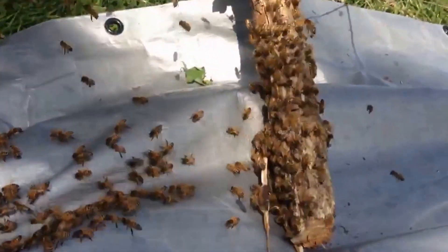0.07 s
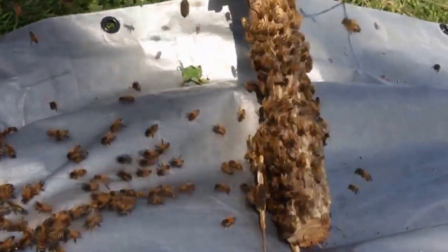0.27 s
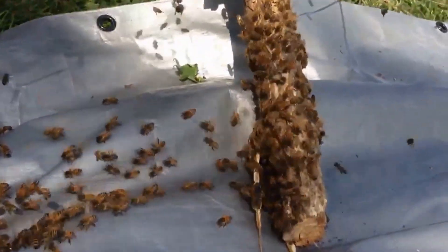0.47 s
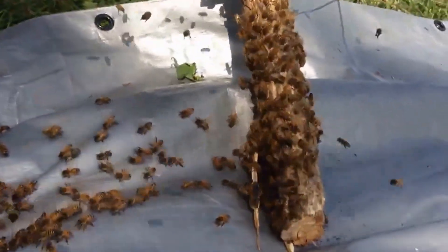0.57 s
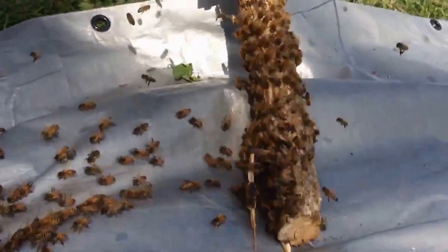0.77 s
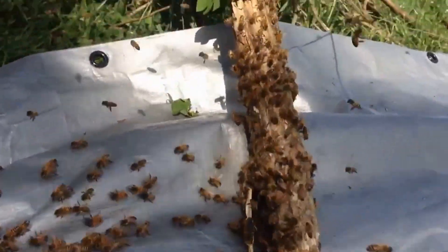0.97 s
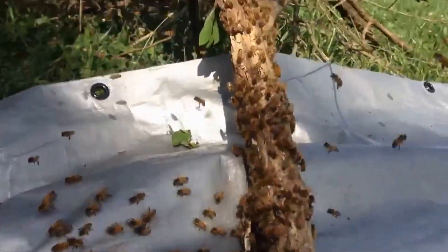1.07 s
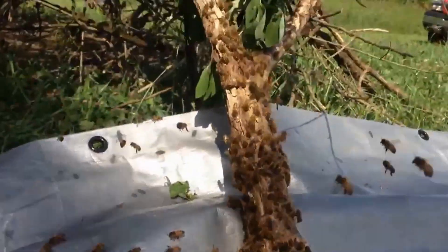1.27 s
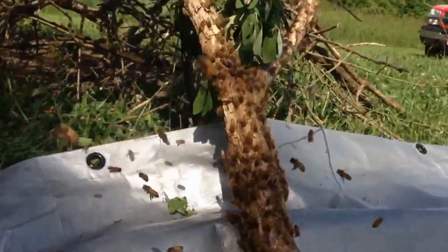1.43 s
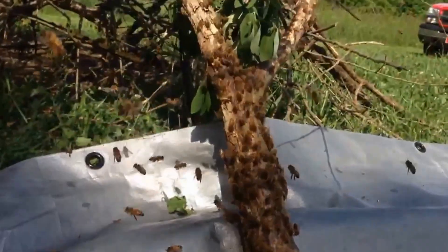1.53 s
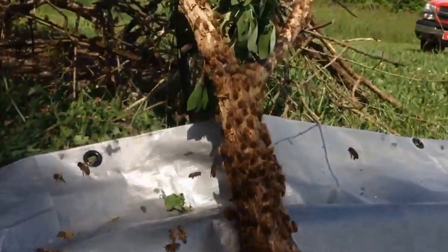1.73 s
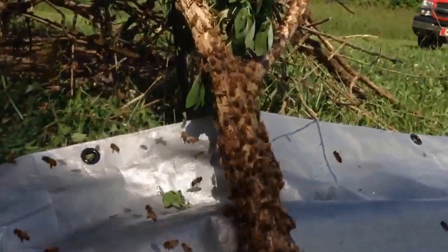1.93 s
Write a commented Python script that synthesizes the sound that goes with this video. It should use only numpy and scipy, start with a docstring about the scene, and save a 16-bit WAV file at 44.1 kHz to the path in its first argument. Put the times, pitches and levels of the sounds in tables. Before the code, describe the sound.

Honeybees hum softly outdoors, with dull bumps on the microphone at the start.

```python
"""A swarm of honeybees hums softly over a tarpaulin outdoors, in a steady hiss of air.
Each bee is a stack of wingbeat harmonics drifting in pitch; a few pass close and stand out.
A hand rubs and bumps the camera, whose case answers with dull thuds; faint high peeps sound far off.
A limiter ducks everything at the first bump and lets it creep back."""
import sys
import numpy as np
from scipy import signal
from scipy.fft import rfft, irfft
from scipy.io import wavfile
from scipy.ndimage import uniform_filter1d, minimum_filter1d

SR = 44100
rng = np.random.default_rng(int(sys.argv[2]) if len(sys.argv) > 2 else 0)


def dump(signal):
    """Clip the signal to [-1, 1] and save it as 16-bit WAV at the path in sys.argv[1]."""
    limited = np.clip(np.atleast_2d(signal).T, -1, 1)
    pcm = np.round(limited * 32767).astype(np.int16)
    wavfile.write(sys.argv[1], SR, pcm)


N = 88200
T = np.arange(N) / SR
FREQS = np.fft.rfftfreq(N, 1 / SR)


def amp(db):
    """Decibels to gain."""
    return 10 ** (np.asarray(db) / 20)


def unit(x):
    """Scales to an rms of one."""
    return x / np.sqrt(np.mean(x ** 2) + 1e-20)


def colour(points, hz):
    """Gain of an EQ curve at the given frequencies."""
    f, db = np.transpose(points)
    return amp(np.interp(np.log(hz + 1), np.log(f), db))


def fader(points):
    """Gain over time from a level curve."""
    return amp(np.interp(T, *np.transpose(points)))


def noise(gain):
    """Noise with the given spectrum, at an rms of one."""
    return unit(irfft(rfft(rng.standard_normal(N)) * gain, N))


def wander(rate_hz):
    """Smooth random motion, mostly slower than rate_hz."""
    return noise(1 / (1 + (FREQS / rate_hz) ** 2))


def swell(centre, half_length):
    """A bell-shaped rise and fall, timed in seconds."""
    return np.exp(-.5 * ((T - centre) / half_length) ** 2)


def burst(centre, half_length, db, hz, octaves):
    """A swell of band noise, 6 dB down at the given octaves either side of hz."""
    shape = swell(centre, half_length)
    band = noise(1 / (1 + (np.log2((FREQS + 1) / hz) / octaves) ** 4))
    return amp(db) * unit(shape * band) * np.sqrt(np.mean(shape ** 2))


def bee(pitch, harmonics=24):
    """Beating wings: one cycle of harmonics, looped at the wingbeat rate."""
    # Tone of the buzz. Each row: frequency in Hz, relative level in dB of a harmonic there.
    buzz = [(200, -5), (300, 2.5), (420, 6.5), (520, 3), (650, -16.5), (1000, -18.5), (1270, -1),
            (1450, -13), (1750, -4.5), (2400, -25.5), (4000, -27), (6000, -26.5)]
    k = np.arange(1, harmonics + 1)
    cycle = np.linspace(0, 1, 512)
    partials = np.cos(2 * np.pi * (k[:, None] * cycle + rng.random((harmonics, 1))))
    wingbeat = colour(buzz, k * pitch.mean()) @ partials
    return np.interp(np.cumsum(pitch) / SR % 1, cycle, wingbeat)


def swarm(count=20, wing_hz=220.85, spread=.085, drift=.025, sway_db=.5):
    """Many bees blur into a hum, each drifting in pitch and loudness as it comes and goes."""
    # Fader ride of the hum. Each row: time in seconds, level in dB.
    hum_level = [(0, -57), (.4, -53), (.8, -49.5), (1.4, -50.5), (1.65, -52.5), (2, -53.5)]
    hum = np.zeros(N)
    for place in np.linspace(-1, 1, count):
        own_hz = wing_hz * np.exp(spread * (place + place ** 3))
        pitch = own_hz * (1 + drift * wander(rate_hz=4))
        hum += bee(pitch) * amp(sway_db * wander(rate_hz=.99))
    return unit(hum) * fader(hum_level)


def air(level_db=-51, patch_db=.8):
    """Broad hiss of the open air, with slight patches drifting through its spectrum."""
    # Tone of the hiss. Each row: frequency in Hz, relative level in dB.
    air_eq = [(25, 0), (100, -7.5), (300, 4), (600, 1), (1000, -0.5), (1900, -4), (2600, -8.5),
              (4000, -10.5), (5600, -13), (8000, -20), (11000, -23), (16000, -24)]
    hz, _, spectra = signal.stft(rng.standard_normal(N), SR, nperseg=512)
    patches = uniform_filter1d(rng.standard_normal(spectra.shape), size=7, axis=0)  # blur in frequency
    patches = unit(uniform_filter1d(patches, size=10, axis=1))  # and in time
    spectra = spectra * colour(air_eq, hz)[:, None] * amp(patch_db * patches)
    return amp(level_db) * unit(signal.istft(spectra, SR)[1][:N])


def finger_rub():
    """Fingers slide on the case at the start: dark friction noise."""
    # Tone of the rub. Each row: frequency in Hz, relative level in dB.
    rub_eq = [(25, -23.5), (55, -8), (85, 2), (160, -3.5), (240, -10.5), (320, -38.5), (480, -26),
              (900, -39.5), (1800, -42), (3500, -45), (6000, -59), (9000, -75), (16000, -67.5)]
    # Its fader ride. Each row: time in seconds, level in dB.
    rub_level = [(0, -29), (.05, -33), (.12, -26.5), (.19, -31), (.215, -31.5), (.25, -54), (.3, -76)]
    return noise(colour(rub_eq, FREQS)) * fader(rub_level)


def rumble():
    """Breeze and handling make a low, uneven rumble."""
    # Tone of the rumble. Each row: frequency in Hz, relative level in dB.
    rumble_eq = [(20, -21.5), (45, 2), (80, 2), (135, -2.5), (200, -7.5), (300, -24), (600, -39.5),
                 (2000, -76)]
    # Its fader ride. Each row: time in seconds, level in dB.
    rumble_level = [(0, -39.5), (.5, -45.5), (.64, -53.5), (.8, -51.5), (1.05, -42.5), (1.14, -49),
                    (1.22, -37), (1.4, -47.5), (1.6, -49.5), (1.74, -50.5), (1.83, -44.5), (2, -53)]
    return noise(colour(rumble_eq, FREQS)) * fader(rumble_level)


def peeps(waver=.011, sag_hz_per_s=820):
    """Short, thin, slightly falling whistles, perhaps a far bird."""
    # Each row: start in seconds, length in seconds, level in dB, pitch in Hz.
    calls = [(0.086, .06, -64.5, 3450), (0.281, 0.079, -61.5, 3450), (0.573, 0.068, -68, 3420),
             (.9, .05, -64.5, 3290)]
    out = np.zeros(N)
    for start, length, db, hz in calls:
        progress = np.clip((T - start) / length, 0, 1)
        pitch = hz * (1 + waver * wander(rate_hz=120)) - sag_hz_per_s * length * (progress - .5)
        envelope = amp(db) * 2 * np.sin(np.pi * progress)
        out += envelope * np.sin(2 * np.pi * np.cumsum(pitch) / SR)
    return out


def case_thuds(push, low_hz=77.5, low_q=1.395, bass_cut_hz=56, shell_hz=248, shell_q=5.2, shell_mix=.71):
    """A push rings the microphone's low resonance and the shell of the case."""
    jf = 1j * FREQS
    mic = jf ** 2 / (jf ** 2 + jf * low_hz / low_q + low_hz ** 2)
    bass_cut = jf / (jf + bass_cut_hz)
    shell = jf * shell_hz / shell_q / (jf ** 2 + jf * shell_hz / shell_q + shell_hz ** 2)
    return irfft(rfft(push) * mic * bass_cut * (1 + shell_mix * shell), N)


def bumps(clack_hz=517, clack_s=.0037, scuff_hz=1340, scuff_s=.0014, tick_s=.0007):
    """The hand knocks the case into a thud; hard contacts also clack, scuff and tick."""
    # Each row: time in seconds, push signed by direction, half the contact time in seconds.
    knocks = [(0.2095, -2, 0.00081), (.2179, -1.5, 0.0012), (0.2678, -2.5, 0.0011), (0.4371, 2, 0.0012),
              (0.746, 0.03, 0.0025), (1.061, 0.0447, 0.0036), (1.372, 0.04, .0016),
              (1.4619, 0.0236, 0.0011)]
    push, clack, grit, tick = np.zeros((4, N))
    hardest = min(contact for _, _, contact in knocks)
    for at, force, contact in knocks:
        push += force * swell(at, contact)
        bite = abs(force) * (hardest / contact) ** 5.6 * (T > at - contact)  # soft contacts barely bite
        age = np.maximum(T - at + contact, 0)
        clack += np.sign(force) * bite * np.exp(-age / clack_s) * np.sin(2 * np.pi * clack_hz * age)
        grit += bite * np.exp(-abs(T - at) / scuff_s)
        tick += bite * np.exp(-abs(T - at) / tick_s)
    muffle = 1 / np.sqrt(1 + (FREQS / scuff_hz) ** 6)
    scuff = irfft(rfft(grit * noise(muffle)) * muffle, N)
    tick *= rng.standard_normal(N)
    return case_thuds(push) + amp(-19) * clack + amp(-28.5) * scuff + amp(-56) * tick


def shudders():
    """The grip shifts and the case gives brief, low shudders."""
    # Each row: centre in seconds, half length in seconds, level in dB, band centre in Hz.
    grip_shifts = [(0.253, 0.042, -22, 95), (0.364, 0.016, -28.5, 110), (0.47, 0.032, -32, 85.1),
                   (0.566, 0.018, -33, 100), (1.266, 0.019, -24, 115)]
    return sum(burst(*row, octaves=.44) for row in grip_shifts)


def near_bees(drift=.012):
    """Single bees pass close, swelling out of the hum with a slight pitch glide."""
    # Each row: centre and half length in seconds, level in dB, wingbeat in Hz, glide in Hz per second.
    flybys = [(0.819, 0.091, -53, 203, 10.5), (1.042, 0.094, -57, 211, 30), (1.424, 0.061, -54, 206, -18.5),
              (1.68, 0.16, -55.5, 247.3, 25), (1.878, 0.052, -51.5, 209.4, 15),
              (1.969, 0.095, -54, 250.3, 20)]
    out = np.zeros(N)
    for centre, half_length, db, hz, glide in flybys:
        pitch = (hz + glide * (T - centre)) * (1 + drift * wander(rate_hz=4))
        out += amp(db) * swell(centre, half_length) * unit(bee(pitch))
    return out


def rustles():
    """Soft brushes of noise, perhaps clothing or grass."""
    # Each row: centre in seconds, half length in seconds, level in dB, band centre in Hz.
    brushes = [(1.36, 0.02, -50.5, 780), (1.985, 0.0066, -55, 2100)]
    return sum(burst(*row, octaves=.48) for row in brushes)


def scene():
    """Bees, outdoor ambience and handling noise, mixed to mono."""
    bed = swarm() + air() + finger_rub() + rumble()
    return (bed + peeps() + bumps() + shudders() + near_bees() + rustles())[None]


def record(dry, ceiling=.98, recover_db_per_s=2, top_hz=16150):
    """A look-ahead peak limiter with a slow release, then a steep high cut."""
    over_db = np.maximum(20 * np.log10(abs(dry[0]) / ceiling + 1e-9), 0)
    ahead_db = -minimum_filter1d(-over_db, size=200)
    recovery_db = recover_db_per_s * T
    held_db = np.maximum.accumulate(ahead_db + recovery_db) - recovery_db
    duck_db = uniform_filter1d(held_db, size=200)
    low_pass = signal.firwin(511, top_hz, window=("kaiser", 9), fs=SR)
    return signal.oaconvolve(dry * amp(-duck_db), low_pass[None], "same")


dry = scene()
out = record(dry)
dump(out)
```